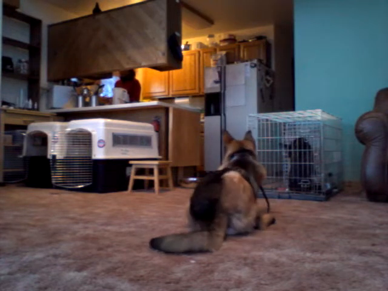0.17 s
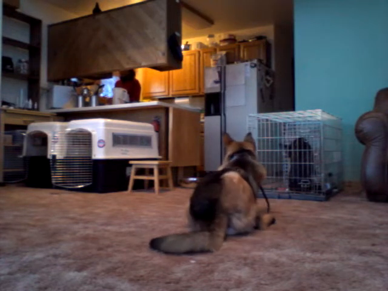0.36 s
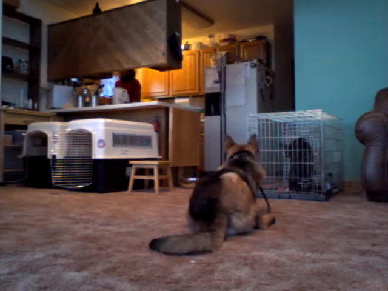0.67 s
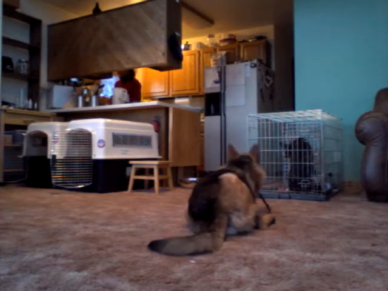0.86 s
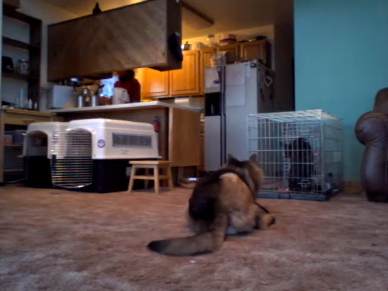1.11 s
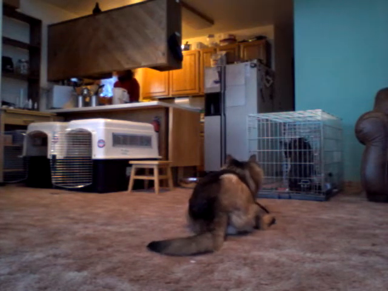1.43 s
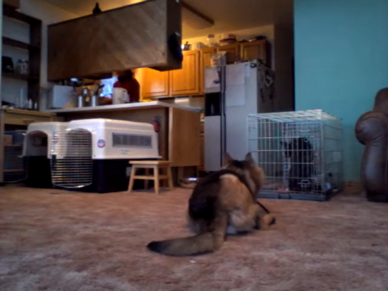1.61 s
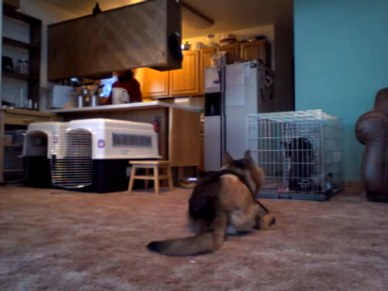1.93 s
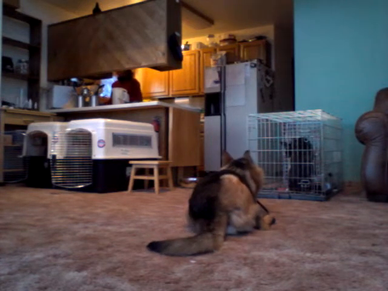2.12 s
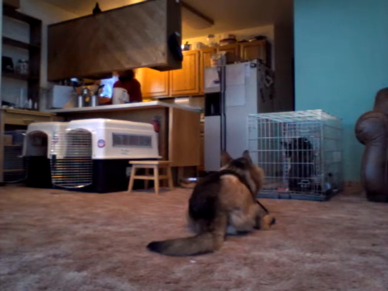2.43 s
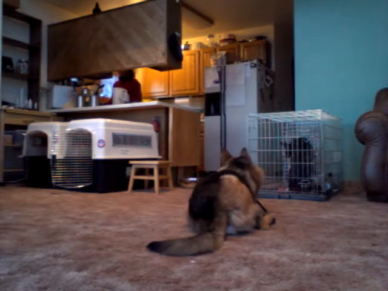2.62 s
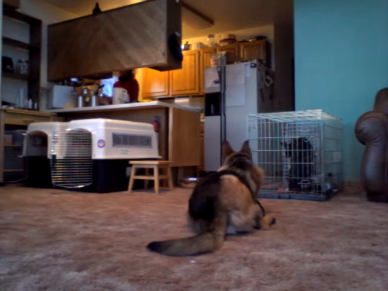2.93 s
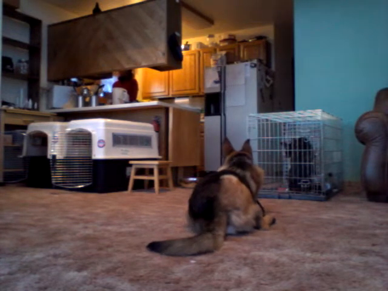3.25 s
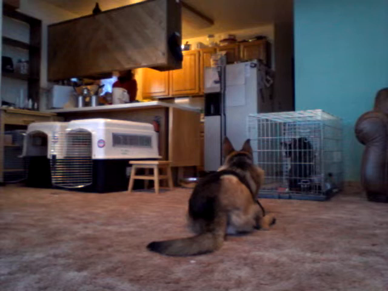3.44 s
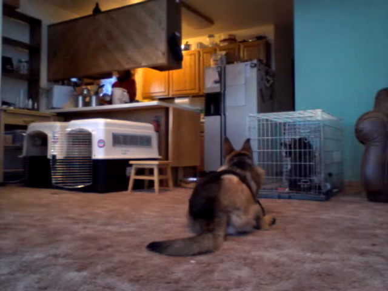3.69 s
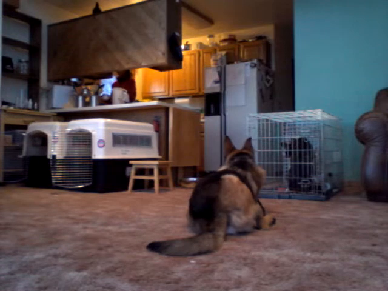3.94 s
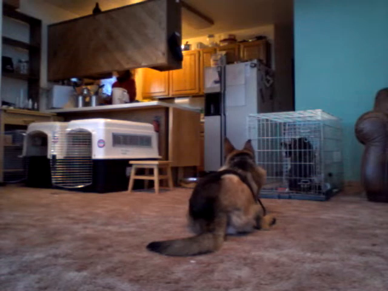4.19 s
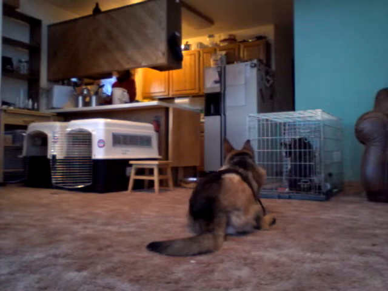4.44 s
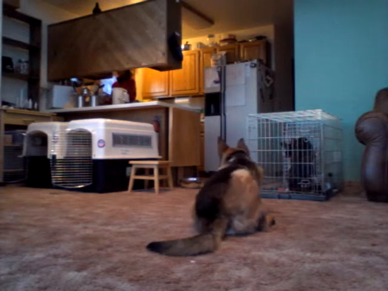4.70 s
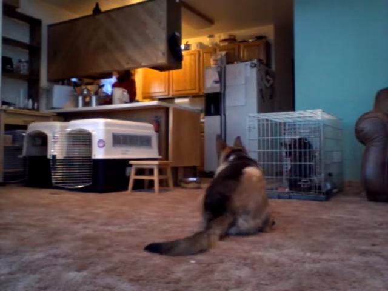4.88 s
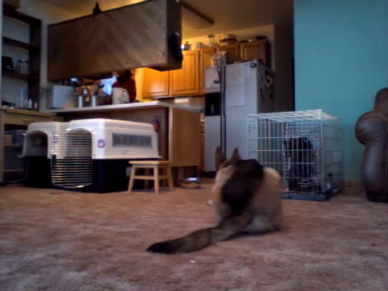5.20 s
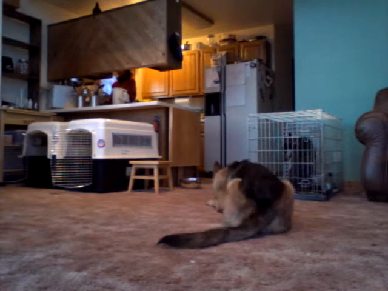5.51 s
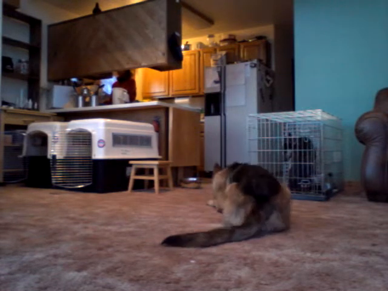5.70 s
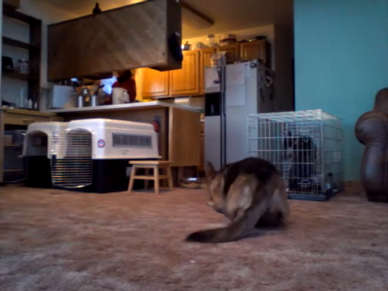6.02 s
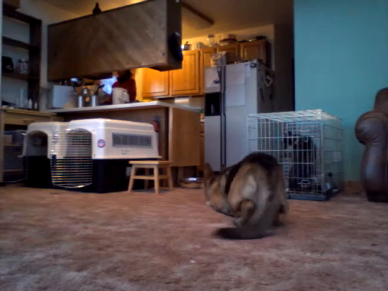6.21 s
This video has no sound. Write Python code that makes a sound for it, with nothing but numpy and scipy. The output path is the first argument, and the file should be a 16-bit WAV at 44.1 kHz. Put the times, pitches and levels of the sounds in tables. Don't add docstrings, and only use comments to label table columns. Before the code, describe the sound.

A German shepherd lying on carpet whines softly through its nose: barely audible at first, clearest just before four seconds, then twice more, the last with a short lower yip. Before that, someone in the kitchen behind makes a hard cupboard knock, a muffled bump and small crockery clinks. Faint collar jingles end it. Roomy indoor echo, low rumble, soft rustle and slight hiss from a modest microphone.

```python
import sys
import numpy as np
from scipy import signal
from scipy.fft import rfft, irfft
from scipy.io import wavfile
from scipy.ndimage import uniform_filter1d, minimum_filter1d

SR = 44100
rng = np.random.default_rng(int(sys.argv[2]) if len(sys.argv) > 2 else 0)


def boost(x):
    u = np.asarray(x, float) / 20
    return 10 ** u


def store_wav(level_fs):
    pcm = np.round(np.clip(np.atleast_2d(level_fs), -1, 1) * 32767)
    wavfile.write(sys.argv[1], SR, pcm.T.astype(np.int16))


N = 280035


def dog():
    steady, rising, throat = whimpers() + peeps(), slides(), yip()
    into_room = boost(-17) * steady * wander(N, size=150)
    into_room += boost(-1.5) * rising
    into_room += boost(-13) * throat * (1 + .7 * wander(N, size=250))
    return steady + rising + throat + room(into_room, .006)


# (time [s], pitch [Hz], level [dB])
HELD = [
    [(0, 4057, -59), (.03, 4060, -59), (.06, 4064, -68), (.075, 4035, -84)],
    [(.425, 4010, -68), (.437, 4005, -60), (.46, 3990, -65), (.476, 3975, -58), (.505, 3990, -65),
     (.53, 3987, -59), (.56, 3995, -57), (.575, 3995, -63), (.625, 3990, -72)],
    [(3.715, 3930, -62), (3.74, 3936, -48), (3.765, 3941, -42), (3.79, 3952, -52), (3.82, 3946, -40),
     (3.848, 3938, -38), (3.875, 3907, -51), (3.92, 3900, -50), (3.965, 3885, -68)],
    [(4.225, 4078, -63), (4.285, 4162, -54), (4.318, 4127, -60), (4.338, 4131, -43), (4.349, 4127, -49),
     (4.362, 4124, -43), (4.373, 4118, -57), (4.387, 4119, -48), (4.45, 4110, -70)],
    [(4.67, 4049, -65), (4.7, 4068, -62), (4.735, 4089, -67), (4.77, 4086, -49), (4.8, 4083, -55),
     (4.83, 4084, -63), (4.87, 4096, -70)],
]
# (pitch [Hz], level against leader [dB], fade [dB/s], ceiling of leader's octave [dB])
NOSTRIL = [
    (3940, 2.5, -100, -69.5),
    (3934, -5.5, -3, -64),
    (4052, 2, -24, -65.5),
    (3873, -4.5, -38, -56.5),
    (3980, 4.5, -29, -66),
]


def whimpers():
    out = np.zeros(N)
    for rows, (other_hz, other_db, fade_db, ceiling_db) in zip(HELD, NOSTRIL):
        s, hz, db = np.transpose(rows)
        octave = np.c_[s, hz, np.minimum(db - 9.5, ceiling_db)]
        other = np.c_[s, other_hz + 0 * s, db + other_db + fade_db * (s - s[0])]
        add(out, *voice(rows, (1,), wobble=.001, rough=.12, size=170))
        add(out, *voice(octave, (2,), wobble=.002, rough=.45, size=200))
        add(out, *voice(other, (1,), wobble=.001, rough=.12, size=170))
    return out


# (start [s], length [s], pitch [Hz], level [dB])
PEEPS = [(3.74, .18, 3450, -79), (3.75, .04, 3450, -66), (3.845, .035, 3450, -64),
         (3.766, .06, 4750, -64.5), (3.787, .06, 5280, -69), (3.86, .07, 7800, -67),
         (3.946, .094, 3885, -62), (4.2, .11, 3520, -63), (4.33, .04, 3520, -66), (4.34, .055, 8200, -62),
         (4.454, .14, 4110, -66.5), (4.609, .08, 3450, -59), (4.66, .1, 3470, -68), (4.715, .05, 8170, -66),
         (4.752, .075, 2335, -65), (4.765, .1, 1170, -60), (4.79, .04, 1070, -58), (4.78, .06, 1700, -74),
         (4.783, .09, 3470, -63), (4.775, .061, 500, -49), (4.853, .1, 3970, -67.5), (.608, .07, 4000, -73),
         (.45, .17, 8000, -75), (5.028, .082, 4360, -66), (5.1, .08, 4310, -71), (5.1, .05, 3480, -64),
         (5.072, .05, 3370, -69), (5.205, .09, 3790, -67), (5.43, .085, 4275, -67)]


def peeps():
    out = np.zeros(N)
    for s, length, hz, db in PEEPS:
        rows = [(s, hz, db - 22), (s + .14 * length, hz, db), (s + length, hz, db - 13.5)]
        add(out, *voice(rows, (1,), wobble=.005, rough=.5, size=120))
    return out


# (start [s], length [s], end pitch [Hz], level [dB])
SLIDES = [
    (.318, .105, 3900, -64),
    (3.665, .053, 3930, -63),
    (4.14, .087, 4080, -65),
    (4.612, .063, 3970, -65),
    (5.085, .13, 3860, -72),
]


def slides():
    out = np.zeros(N)
    start_hz, bend, start_db = 3360, 1.6, -8
    u = np.linspace(0, 1, 9)
    for s, length, hz, db in SLIDES:
        pitch_hz = start_hz + (hz - start_hz) * u ** bend
        rows = np.c_[s + length * u, pitch_hz, db + start_db * (1 - u) ** 4]
        add(out, *voice(rows, (1,), wobble=.006, rough=.5, size=110))
    return out


# (time [s], pitch [Hz], level [dB])
YIP = [
    (4.735, 600, -62),
    (4.762, 586, -44),
    (4.782, 572, -38),
    (4.79, 545, -50),
    (4.806, 550, -46),
    (4.85, 550, -63),
]


def yip():
    out = np.zeros(N)
    s, hz, db = np.transpose(YIP)
    ends = s[[0, -1]]
    second_db = db + np.interp(s, ends, (-37.5, 4))
    fourth_db = db + np.interp(s, ends, (-33, -35))
    rows = np.c_[s, hz, db, second_db, fourth_db]
    add(out, *voice(rows, (1, 2, 4), wobble=.008, rough=.12, size=250))
    return out


def voice(rows, multiples, wobble, rough, size):
    s, hz, *levels_db = np.transpose(rows)
    t = np.arange(s[0], s[-1], 1 / SR)
    pitch_hz = np.interp(t, s, hz) * (1 + wobble * wander(len(t), size=150))
    turns = np.cumsum(pitch_hz) / SR + rng.random()
    air_flow = 1 + rough * (wander(len(t), size=size) + 1j * wander(len(t), size=size))
    tone = 0
    for k, db in zip(multiples, levels_db):
        partial = (air_flow * np.exp(2j * np.pi * k * turns)).real
        tone = tone + boost(np.interp(t, s, db)) * partial
    fade_s = .006
    since_start = t - s[0] + fade_s * (s[0] == 0)
    edges = np.clip(np.minimum(since_start, s[-1] - t) / fade_s, 0, 1)
    return s[0], np.sqrt(2 / (1 + 2 * rough ** 2)) * tone * edges


# (time [s], level [dB], length of the blow [s])
KNOCKS = [(0.386, -52, 0.0048), (0.9602, -30.5, 0.0034), (1.273, -47.5, 0.015), (1.605, -77, 0.011),
          (1.906, -40.5, 0.018), (2.472, -53, 0.059), (2.623, -52.5, 0.038), (3.192, -64, 0.025),
          (3.749, -69, 0.011), (6.096, -57, 0.011), (0.9716, -32.5, 0.0019), (0.984, -40.5, 0.0045),
          (0.9967, -47, .002), (1.921, -42, 0.014), (1.942, -56.5, 0.0061), (6.141, -59.5, .012),
          (.289, -80, .003)]
# (frequency [Hz], level [dB])
TAP = [(59, -45), (100, -8.5), (1800, 0.5), (2690, -11), (3700, -4), (5280, -16), (7800, -10), (15500, -32)]
DOOR = [(50, -19.5), (200, -4), (310, 1), (420, -5.5), (560, -2.5), (1000, -8.5), (1450, -11.5),
        (2200, -7.5), (3100, -24.5), (4200, -21.5), (5700, -27.5), (7920, -21), (15500, -39.5)]
PLANK = [(59, -55), (100, -6.5), (394, -13), (630, 2.5), (1060, -14), (1310, -15), (2200, -13),
         (3390, -17.5), (7000, -21), (15500, -31)]
TICK = [(800, 3), (1500, -19), (2100, 10), (2800, -11), (5000, -27)]
BUMP = [(70, -2.5), (750, -4.5), (1250, -16), (1800, -12), (2450, -19.5), (3000, -32), (5200, -45),
        (8510, -35), (12000, -62)]
PLATE = [(1000, -3.5), (1600, -1), (2500, -12), (3100, -15), (3900, 1), (4400, -20), (5400, -1), (6200, -7),
         (8000, 1.5), (15500, 0)]
MUG = [(150, -5), (320, 10), (900, -5), (2300, -19), (3300, -18), (7400, -15), (10000, -11.5), (15500, -33)]
CLINK = [(3000, -32), (3870, -19), (5500, -21), (7700, -1), (10000, -4), (15500, -17)]
SNAP = [(500, -6), (1500, -3), (3000, -12), (5200, -10.5), (6500, -6), (10000, -6), (14000, -39)]
PAW = [(45, -10), (95, 4.5), (200, -18), (380, -12), (745, -28), (1500, -28), (1950, -66), (3300, -120)]
PAD = [(100, -7), (250, -23), (385, 12), (600, -9), (1300, -13), (2500, -61)]
# (time [s], peak [dB], length [s])
SHOVES = [
    (0.9605, -14, 0.0013),
    (.9715, -21, 0.00092),
    (0.9736, -20, 0.0026),
    (1.9215, -27, 0.0016),
    (1.926, -29, 0.002),
]


def knocks():
    out, t = np.zeros(N), np.arange(4096) / SR
    colours = (TAP, DOOR, PLANK, TICK, BUMP, PLATE, MUG, CLINK, SNAP, PAW,
               DOOR, DOOR, DOOR, BUMP, BUMP, PAD, TAP)
    for (s, db, length), colour in zip(KNOCKS, colours):
        body = boost(db + 34) * struck_body(colour)
        crack = rng.standard_normal(4096) * np.exp(-t / length) * (1 - np.exp(-t / .004))
        crack = crack / np.linalg.norm(crack)
        add(out, s, boost(-18.5) * signal.fftconvolve(crack, body))
        add(out, s - .002, room(body, .53 * length))
    for s, db, length in SHOVES:
        u = np.arange(0, 2 * length, 1 / SR) / length
        push = np.sin(np.pi * u) * np.exp(-u)
        add(out, s, boost(db) * (push.mean() - push))
    return out


def struck_body(colour):
    gain_db = np.maximum(read(colour, np.fft.rfftfreq(4096, 1 / SR)), -80)
    log_gain = np.log(boost(np.r_[gain_db, gain_db[-2:0:-1]]))
    spectrum = np.exp(np.conj(signal.hilbert(log_gain)))
    body = np.fft.ifft(spectrum).real[:2048]
    return body / np.linalg.norm(body)


# (frequency [Hz], level [dB], decay time T60 [s])
CUPBOARD = [(313.6, 3.5, 0.23), (363, -12, 0.15), (465, -17, 0.12), (676, -4, 0.16), (807, -2, 0.07),
            (1040, -6.5, 0.21), (1165, -23, .15), (1610, 3, 0.07), (2014, -0.5, 0.16), (2130, -18, 0.14)]
BOARD = [(627, -10, 0.14), (700, -24, 0.11), (1036, -8, 0.15), (1840, -4, 0.066), (1990, -8, .08),
         (3750, -13, 0.11)]
THUD = [(74.6, -23, 0.11), (104, 4, 0.11), (127.5, 2.5, 0.22), (158, -0.5, 0.203), (197, -14, 0.253),
        (272, -8, 0.44)]
CRATE = [(743, -7, .16), (865, -2, 0.16), (1630, -3, 0.14), (2020, -11, 0.17)]
BOWL = [(1540, -1, 0.093), (1627, 2.5, 0.13), (1687, -5, 0.081), (2446, -5, 0.34)]
DISH = [(1620, -5, 0.39), (2502, 6, 0.22), (3840, -8, 0.49), (4700, -17, 0.38), (5660, -15, 0.44),
        (6417, -21, 0.3), (7270, -2, 0.4), (7983, -4, 0.39), (8540, -6, 0.16), (9800, -4, 0.16),
        (10500, -8, 0.16), (11500, -14, .2), (13200, -18, .2), (14500, -12, .2)]
CUP = [(2500, 0, 0.12), (3930, -5, 0.26), (5040, -16, 0.12), (5420, -6.5, 0.13), (5720, -3.5, 0.21),
       (7300, -2.5, 0.21), (7890, -12, 0.34), (8500, -18, .15), (9400, -7, 0.1), (11200, -21, .12),
       (13000, -18, .12)]
GLASS = [(3850, -3, 0.11), (4520, -6, 0.11), (5400, -10, .12), (5960, -11, .12), (7160, 3, 0.3),
         (7770, -6, .15), (7970, 2, 0.18), (9430, -5, 0.3), (10400, -19, .15), (11600, -21, .12)]
TAG = [(8600, -13, 0.094), (10430, -4, 0.17), (11800, -7, .12), (13100, -35, 0.097)]
COLLAR = [(7000, 3.5, 0.2), (7600, -5, 0.3), (8050, -5, 0.37), (8690, -0.5, 0.4), (10100, -8, 0.089),
          (11600, -8, 0.22)]
PANEL = [(4380, 0, 0.098)]
# (modes, spread of each mode [share of its pitch], [(time [s], level [dB])])
STRIKES = [
    (THUD, 0.028, [(.963, -49), (1.912, -51)]),
    (CUPBOARD, 0.027, [(.962, -46.5), (.9725, -34)]),
    (BOARD, 0.061, [(1.274, -47), (1.288, -46), (1.313, -47.5)]),
    (DISH, 0.025, [(2.466, -62), (2.474, -59), (2.497, -70)]),
    (CRATE, 0.047, [(1.915, -58), (1.925, -48), (1.95, -55)]),
    (BOWL, 0.031, [(2.466, -54.5), (2.476, -57), (2.53, -71)]),
    (CUP, 0.026, [(2.625, -59), (2.648, -61)]),
    (GLASS, 0.0098, [(3.19, -73), (3.207, -76)]),
    (TAG, 0.011, [(.829, -75), (.869, -54), (.896, -54.5)]),
    (COLLAR, 0.0098, [(5.895, -81), (6.112, -77.5), (6.15, -69.5), (6.172, -68), (6.195, -71), (6.222, -69), (6.245, -75), (6.27, -77)]),
]


def ringing():
    dry, t = np.zeros(N), np.arange(SR // 3) / SR
    soft_start = 1 - np.exp(-t / .002)
    for modes, spread, strikes in STRIKES + [(PANEL, .03, [(1.936, -61)])]:
        for s, strike_db in strikes:
            for hz, db, t60 in modes:
                lines = hz * (1 + spread * rng.uniform(-1, 1, (9, 1)))
                phase = min(hz / 1500, 1) * rng.random((9, 1))
                cluster = np.sin(2 * np.pi * (lines * t + phase)).sum(0)
                cluster = 2 * cluster / np.sqrt(np.mean(cluster[:SR // 16] ** 2))
                decay = boost(strike_db + db - 10 - 60 * t / min(t60, .35))
                add(dry, s, decay * cluster * soft_start)
    return boost(7.5) * dry + room(dry, .0013)


# (first slip [s], last slip [s], number of slips)
CREAKS = [
    (3.7454, 3.7504, 2),
    (3.9893, 3.9893, 1),
    (4.0152, 4.0797, 9),
    (4.127, 4.127, 1),
    (4.1697, 4.211, 5),
    (4.2423, 4.2597, 3),
    (4.2862, 4.31, 4),
    (4.367, 4.367, 1),
]
# (frequency [Hz], width [Hz], level [dB])
CREAK_BODY = [(9590, 800, 0), (10686, 1200, -2), (11900, 1200, -2), (13500, 1200, -3)]


def creak():
    t, dry = np.arange(300) / SR, np.zeros(N)
    times = np.concatenate([np.linspace(*burst) for burst in CREAKS])
    chance = rng.standard_normal((len(times), 2))
    slip_s = times + .0018 * chance[:, 0]
    slip_db = -49 + .5 * chance[:, 1]
    for s, db in zip(slip_s, slip_db):
        click = 0
        for hz, width_hz, mode_db in CREAK_BODY:
            tone = np.sin(2 * np.pi * (hz * t + .5 * rng.random()))
            click = click + boost(mode_db) * np.exp(-np.pi * width_hz * t) * tone
        click = click * (1 - np.exp(-t / .0004)) ** 2
        add(dry, s, boost(db - 1.5) * click / abs(click).max())
    return dry + boost(-2.5) * room(dry, .0035)


# (frequency [Hz], level [dB])
AIR = [(20, -16), (35, 6.5), (55, 1), (85, -3.5), (130, 4.5), (250, -2.5), (350, 2.5), (500, -5), (800, -6),
       (1100, -14.5), (1700, -19.5), (3000, -22.5), (5200, -32.5), (6500, -30.5), (8000, -23.5),
       (11000, -23.5), (15500, -29)]
# (frequency [Hz], width [Hz], level [dB])
AIR_MODES = [(115, 8.6, 4), (206, 14, 8), (294, 6.9, 6.5), (352, 5.8, 6.5), (496, 13, 4)]
# (time [s], width [s], level over the hiss [dB])
RUSTLES = [
    (.55, 0.088, 7.5),
    (1.05, 0.26, 12.5),
    (2.62, 0.088, 12.5),
    (3.82, 0.1, 5.5),
    (4.4, 0.64, 5),
    (6.35, 0.25, 6.5),
]
# (time [s], width [s], level [dB])
RUMBLES = [
    (.15, 0.32, 4),
    (3.95, 0.44, -0.5),
    (5.9, 0.32, 3.5),
]


def air():
    frames, hz = N // 256 + 5, np.fft.rfftfreq(1024, 1 / SR)
    a, b, patches = rng.standard_normal((frames, 513, 3)).T
    patches = uniform_filter1d(patches, size=8, axis=0)
    patches = evened(uniform_filter1d(patches, size=12, axis=1))
    t = np.arange(frames) * 256 / SR
    high = np.clip(np.log2((hz + 1) / 4500) + .5, 0, 1)[:, None]
    low = np.clip(np.log2(900 / (hz + 1)) + .5, 0, 1)[:, None]
    rustle_share = high + .059 * (1 - low - high)
    stir_db = low * (.5 + swells(RUMBLES, t)) + rustle_share * swells(RUSTLES, t)
    noise = (a + 1j * b) * boost(stir_db + 2.88 * patches)
    tone = signal.istft(noise, nperseg=1024, noverlap=768)[1][:N]
    fine_hz = np.fft.rfftfreq(N, 1 / SR)
    shape_db = read(AIR, fine_hz)
    for mode_hz, width_hz, db in AIR_MODES:
        shape_db = shape_db + db / (1 + (2 * (fine_hz - mode_hz) / width_hz) ** 2)
    return boost(-59) * evened(irfft(rfft(tone) * boost(shape_db), N))


# (time [s], width [s], level over rest [dB])
HUM_SWELLS = [
    (.97, 0.24, 15),
    (1.57, 0.1, 18),
    (2, 0.087, 23.4),
    (3.3, 0.83, 11),
    (5.29, 0.28, 16.4),
    (6.1, 0.49, 14),
]


def hum():
    turns = np.cumsum(58.9 * (1 + .108 * wander(N, size=1200))) / SR
    level_db = -75.5 + swells(HUM_SWELLS, np.arange(N) / SR) + 4.4 * wander(N, size=1800)
    return boost(level_db) * np.sin(2 * np.pi * turns)


# (frequency [Hz], T60 [s])
ROOM_T60 = [(60, 0.46), (250, 0.35), (1000, 0.35), (2500, 0.39), (4500, .37), (7000, 0.32), (10000, .27),
            (14000, 0.16)]


def room(x, build_s):
    taps = np.zeros(SR)
    at = np.arange(100, SR - 12, 12) + rng.integers(0, 12, (SR - 101) // 12)
    taps[at] = rng.choice([-1., 1.], at.shape)
    hz, t, z = signal.stft(taps, SR, nperseg=256)
    decay = boost(-60 * t / read(ROOM_T60, hz)[:, None])
    tail = signal.istft(z * decay, SR, nperseg=256)[1]
    tail = tail * (1 - np.exp(-np.arange(len(tail)) / SR / build_s))
    return signal.fftconvolve(x, tail / np.linalg.norm(tail))[:N]


def swells(rows, t):
    return sum(db * np.exp(-((t - s) / width) ** 2) for s, width, db in rows)


def wander(count, size):
    noise = uniform_filter1d(rng.standard_normal(count), size)
    return evened(uniform_filter1d(noise, size))


def evened(x):
    return x / np.sqrt(np.mean(x ** 2) + 1e-20)


def read(points, hz):
    f, value = np.transpose(points)
    return np.interp(np.log(hz + 1), np.log(f + 1), value)


def add(mix, s, sound):
    part = mix[round(s * SR):][:len(sound)]
    part += sound[:len(part)]


def scene():
    return (dog() + knocks() + ringing() + creak() + air() + hum())[None]


# (offset [dB], slope upward [dB/octave], slope downward
# [dB/octave])
GATE = (23, 36, 100)
# (frequency [Hz], distance [dB])
STARVED = [(4700, 90), (5200, 50), (6100, 50), (6800, 70), (9500, 70), (10200, 53), (13000, 51),
           (15500, 47)]


def gated(sound):
    z = signal.stft(sound, nperseg=2048, noverlap=1536)[2]
    bands = z[:1024].reshape(128, 8, -1)
    power = (abs(bands) ** 2).sum(1)
    level_db = 10 * np.log10(power + 1e-20)
    total_db = 10 * np.log10(power.sum(0) + 1e-20)
    octaves = np.log2(np.arange(128) + .5)
    apart = octaves[:, None] - octaves[None]
    spread_db = GATE[0] + np.maximum(GATE[1] * apart, -GATE[2] * apart)
    threshold_db = (level_db[None] - spread_db[:, :, None]).max(1)
    whistling = level_db[19:26].max(0) - level_db[28:34].mean(0) > 17
    in_time_db = -minimum_filter1d(-np.where(whistling, threshold_db, -200), 7, axis=1)
    threshold_db[25:37] = np.maximum(threshold_db, in_time_db + 1)[25:37]
    threshold_db[37:] -= 6
    band_hz = (np.arange(128) + .5) * SR / 256
    threshold_db = np.maximum(threshold_db, total_db - read(STARVED, band_hz)[:, None])
    rest_db = np.median(level_db, axis=1)[:, None]
    usual_db = np.minimum(signal.medfilt2d(level_db, (1, 15)), rest_db + 6)
    threshold_db[18:] = np.maximum(threshold_db, usual_db - 6.5)[18:]
    around_db = -minimum_filter1d(-uniform_filter1d(level_db, 3, axis=1), 7, axis=0)
    valley_db = np.where(total_db > -54, around_db - 13, -200)
    threshold_db[15:40] = np.maximum(threshold_db, valley_db)[15:40]
    kept = np.clip((level_db - threshold_db) / 3, 0, 1)
    kept[91:96] *= (level_db > rest_db + 24)[91:96]
    kept[96:] = 0
    z = np.vstack([(bands * kept[:, None]).reshape(1024, -1), z[1024:]])
    return signal.istft(z, nperseg=2048, noverlap=1536)[1][:N]


def top_cut(x):
    return signal.sosfilt(signal.butter(12, 16470, fs=SR, output="sos"), x)


def record(dry):
    mix = gated(dry[0])[None]
    return top_cut(mix)


dry = scene()
out = record(dry)
store_wav(out)
```